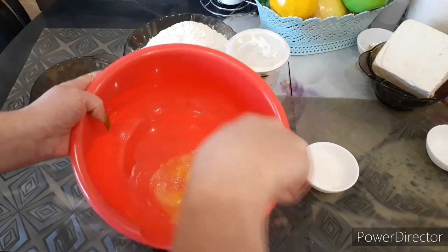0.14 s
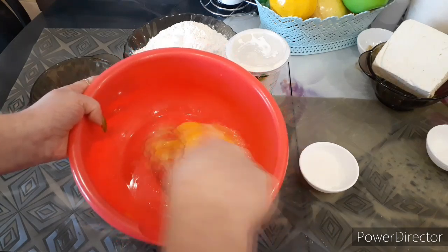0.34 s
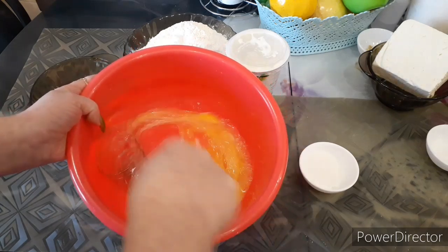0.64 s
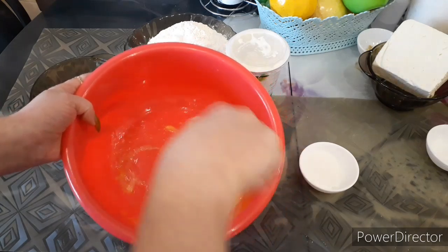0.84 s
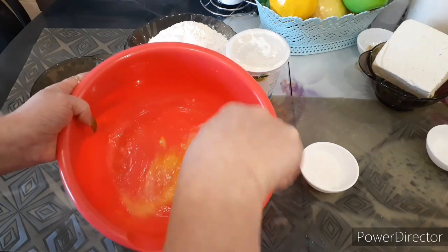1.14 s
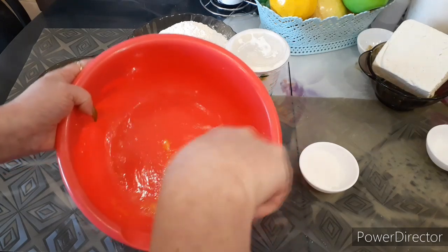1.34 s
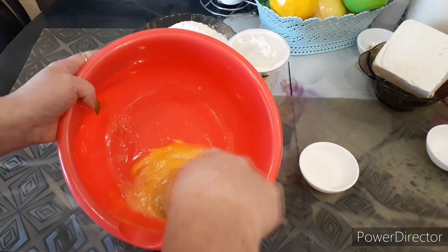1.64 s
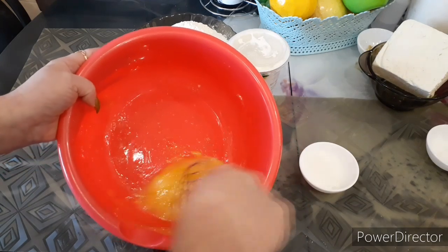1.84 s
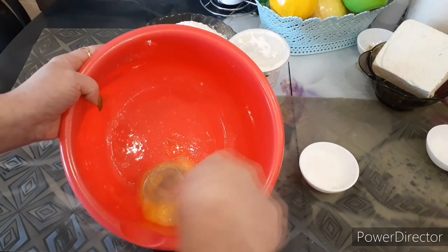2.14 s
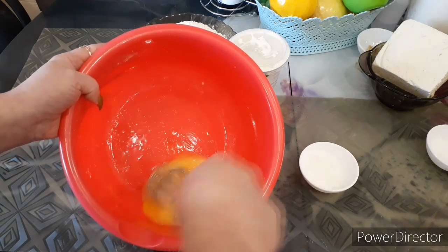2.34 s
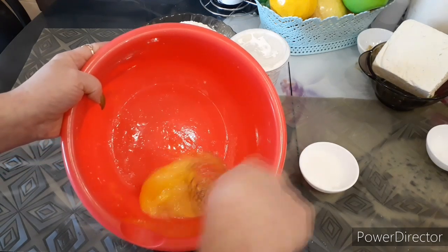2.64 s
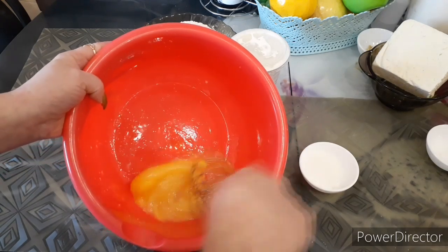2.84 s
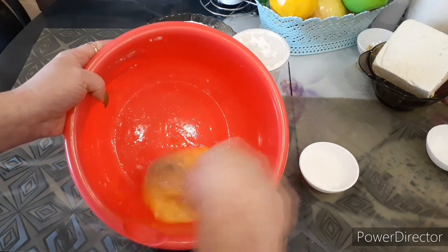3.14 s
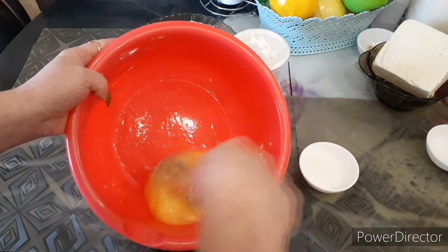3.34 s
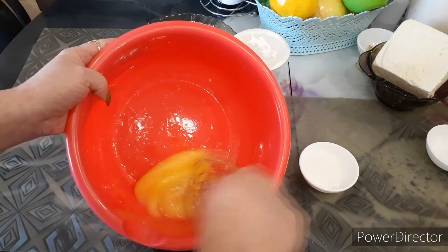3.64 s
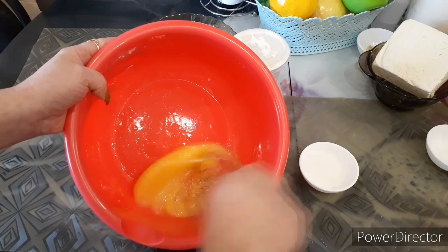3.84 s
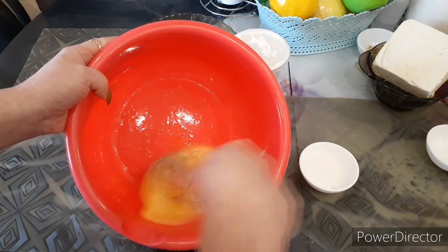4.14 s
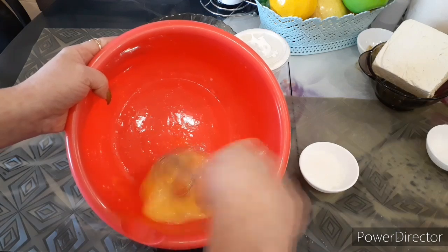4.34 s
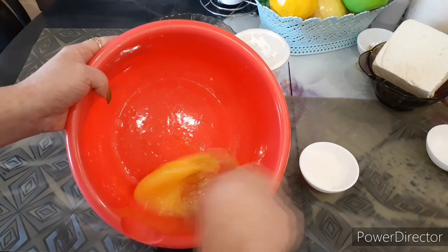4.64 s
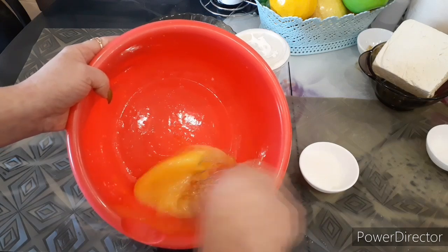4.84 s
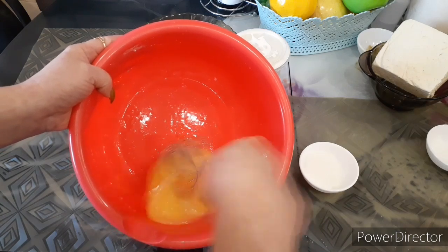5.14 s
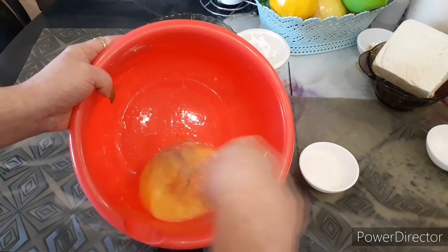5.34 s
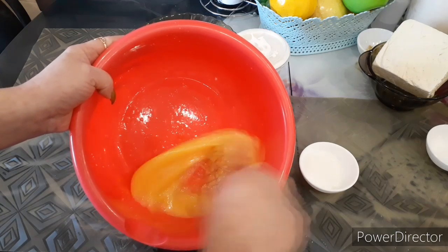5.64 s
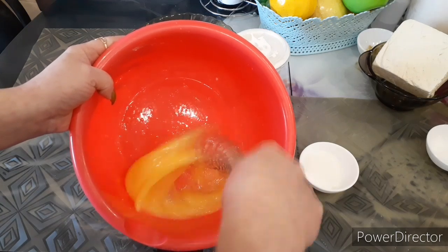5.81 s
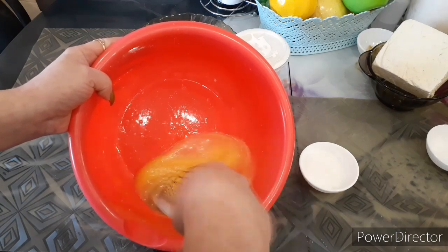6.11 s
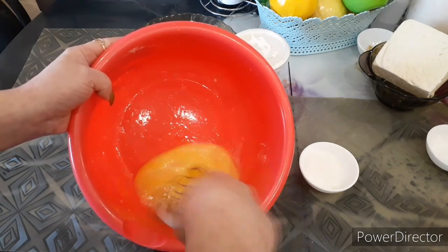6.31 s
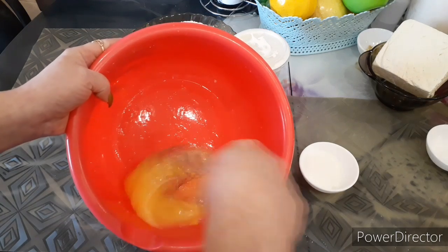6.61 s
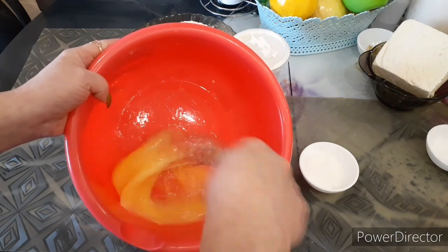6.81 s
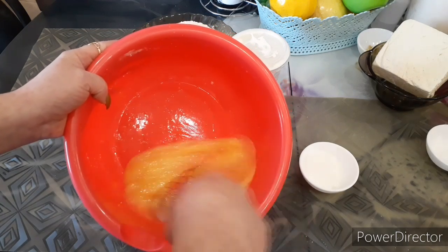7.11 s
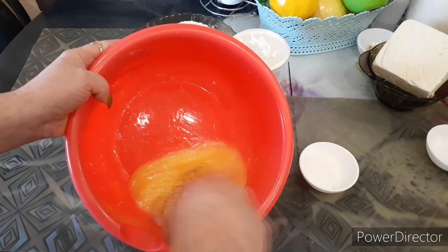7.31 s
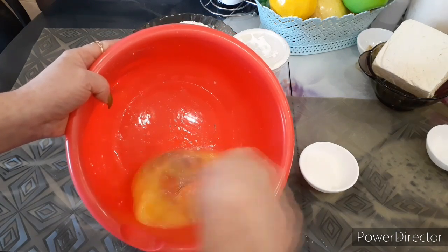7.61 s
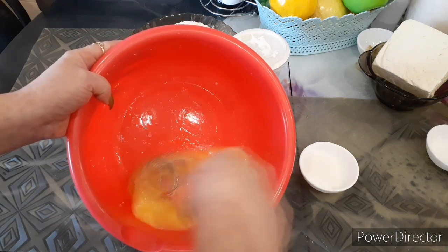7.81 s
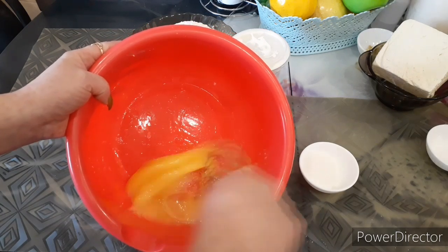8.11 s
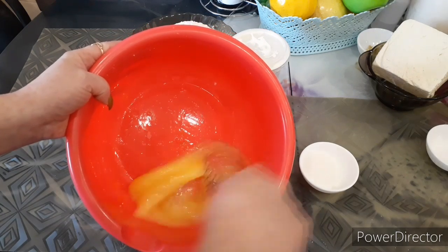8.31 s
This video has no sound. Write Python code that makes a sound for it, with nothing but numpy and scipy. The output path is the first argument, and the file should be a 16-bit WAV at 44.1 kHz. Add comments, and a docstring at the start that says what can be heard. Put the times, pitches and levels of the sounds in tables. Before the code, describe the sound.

A wire whisk quickly slaps the wall of a hollow plastic bowl while beating eggs, with wet scraping between the strokes, close up in a kitchen.

```python
"""In a kitchen, a wire whisk beats eggs in a tilted plastic bowl, about five turns a second, close to a two-port microphone.
The wires slap the wall (noise bursts and ringing tones) and bounce, so the bowl booms (low ringing tones).
They drag through the egg throughout (uneven filtered noise and tiny wet tones); each contact also pushes
the table (low tones). The kitchen answers with fading noise, over a faint hum of steady noise."""
import sys
import numpy as np
from scipy import signal
from scipy.fft import rfft, irfft, next_fast_len
from scipy.io import wavfile
from scipy.ndimage import uniform_filter1d, map_coordinates

SR = 44100
rng = np.random.default_rng(int(sys.argv[2]) if len(sys.argv) > 2 else 0)


def wav_record(signal):
    """Record a signal, one row per channel, as 16-bit PCM in the file named by sys.argv[1]."""
    frames = np.transpose(np.atleast_2d(signal))
    bounded = np.clip(frames, -1, 1)
    # unit amplitude maps onto the largest positive 16-bit level
    quanta = np.round(bounded * 32767).astype(np.int16)
    wavfile.write(sys.argv[1], SR, quanta)


N = 373086  # length [samples]


def amp(db):
    """Turn decibels into a plain multiplier."""
    return 10 ** (np.asarray(db) / 20)


def unit(x):
    """Scale a sound to an average (RMS) size of 1."""
    return x / np.sqrt(np.mean(x ** 2) + 1e-20)


def along(points, hz):
    """Read a curve of (frequency, value) points on a log frequency axis."""
    f, v = np.transpose(points)
    return np.interp(np.log(hz + 1), np.log(f + 1), v)


def filtered(x, response):
    """Multiply the spectrum of x by a complex response of frequency."""
    size = next_fast_len(N + 8192)
    return irfft(rfft(x, size) * response(np.fft.rfftfreq(size, 1 / SR)), size)[..., :N]


def causal(points):
    """Make a short minimum-phase filter of energy 1: its colour arrives as early as possible."""
    size = 2048
    curve = amp(along(points, np.fft.rfftfreq(size, 1 / SR)))
    cepstrum = irfft(np.log(curve + 1e-6))
    # folding the second half onto the first gives minimum phase
    cepstrum[1:size // 2] *= 2
    cepstrum[size // 2 + 1:] = 0
    h = irfft(np.exp(rfft(cepstrum)))[:size // 2]
    return h / np.linalg.norm(h)


def coloured(x, points):
    """Give noise the colour drawn by the points."""
    return signal.fftconvolve(x, causal(points)[None], axes=1)[:, :N]


def add(bus, s, sound):
    """Mix a short sound into the bus at s seconds."""
    i = max(round(s * SR), 0)
    bus[:, i:i + sound.shape[1]] += sound


def ring(modes, rise, spread_db, detune, lift_db=lambda hz: 0, punch=0, punch_s=0.0008):
    """One blow: every mode at a new strength, slightly retuned by grip and egg, in two versions."""
    t = np.arange(SR // 10) / SR
    hz, db, t60 = np.transpose(modes)[:, :, None]
    hz = hz * (1 + detune * rng.standard_normal(hz.shape))
    t60 = t60 * np.exp(.25 * rng.standard_normal())  # egg damps each spot differently
    shared = rng.standard_normal((len(hz), 1))
    own = rng.standard_normal((2, len(hz), 1))
    size = amp(db + lift_db(hz) + spread_db * (shared + .5 * own) - 60 * t / t60)
    sign = rng.choice([-1, 1], size=(2, len(hz), 1))
    # the struck spot empties fast
    shape = (1 - np.exp(-t / rise)) ** 2 * (1 + punch * np.exp(-t / punch_s))
    sound = (sign * size * np.sin(2 * np.pi * hz * t)).sum(1) * shape
    return sound / np.abs(sound).max(1, keepdims=True)


def burst(snap_t60, scatter_t60, scatter_db, count=9):
    """Noise: the first wire snaps, the others land unevenly after it; an echo across the bowl colours each spot."""
    t = np.arange(SR // 12) / SR
    late = t - .003 - rng.exponential(0.017, size=(count, 1))  # time since each later wire landed [s]
    sizes_db = rng.uniform(-6, 6, size=(count, 1))
    others = (late > 0) * amp(sizes_db - 60 * np.abs(late) / .007)
    snap = amp(-60 * t / snap_t60)
    scatter = amp(scatter_db - 60 * t / scatter_t60) * (.5 + others.sum(0))
    sound = (snap + scatter) * (1 - np.exp(-t / 0.00046)) * rng.standard_normal((2, len(t)))
    across = rng.integers(5, 40)  # echo delay [samples]
    return sound + .5 * np.pad(sound, ((0, 0), (across, 0)))[:, :len(t)]


# wires meeting the wall: (time [s], slap level [dB], treble level over the slap [dB],
# knock level [dB], central knock pitch [Hz], whole-shell ring level [dB])
HITS = [(0.0259, -27, -15, -26.5, 587, -30), (0.0835, -27.5, -27, -28, 665, -33),
        (0.1097, -11.5, -12.5, -13.5, 630, -25.5), (0.2742, -33, -14, -39, 501, -57),
        (0.2877, -27.5, -32, -37.5, 544, -60), (0.302, -32.5, -15, -36, 590, -45),
        (0.3691, -28, -22, -27.5, 512, -43), (0.4245, -32.5, -8, -33.5, 568, -52),
        (0.4567, -26, -10.5, -45, 636, -46), (0.5082, -34, -22, -30, 587, -56),
        (0.5744, -26, -20, -15, 569, -46), (0.6141, -14.5, -13, -28, 610, -42),
        (0.7216, -19, -2, -29, 620, -36), (0.7405, -23, -9, -21, 656, -37.5),
        (0.7784, -29.5, -0.5, -25.5, 630, -53), (0.8157, -32, -8, -34, 660, -40),
        (0.9068, -22, -6.5, -26, 608, -43), (0.9864, -35, -10, -39, 670, -50),
        (1.042, -21, -13, -15.5, 549, -29.5), (1.0784, -35.5, -5, -33, 600, -51),
        (1.119, -33, -1.5, -36, 550, -53), (1.174, -20.5, -15.5, -29.5, 545, -46),
        (1.2161, -30.5, -13, -33, 541, -49), (1.3494, -56, -19, -49, 576, -47),
        (1.529, -36.5, -15, -44, 604, -37), (1.5457, -26.5, -27, -28, 553, -38),
        (1.6111, -27, -8, -29, 610, -26.5), (1.6189, -20, -7.5, -12.5, 585, -29),
        (1.659, -10, -12.5, -20, 558, -51), (1.8177, -35, -15, -35, 530, -49),
        (1.8967, -13.5, -13, -19, 606, -34), (2.0453, -41.5, 1, -33.5, 580, -44),
        (2.124, -14, -9, -19, 588, -38), (2.1418, -20.5, -13, -27, 570, -33),
        (2.2766, -29.5, -27, -27, 590, -40), (2.3452, -11, -10, -15.5, 573, -29.5),
        (2.4917, -29, -5, -28.5, 610, -34), (2.5407, -19.5, -13.5, -13.5, 583, -35),
        (2.551, -17.5, -8.5, -31, 600, -31), (2.5704, -24, -17, -42, 615, -41),
        (2.6263, -33, -19, -52, 603, -52), (2.6961, -21, -18, -22, 592, -40),
        (2.7382, -17.5, -18, -15.5, 597, -30), (2.7529, -14.5, -12.5, -39, 630, -35),
        (2.8825, -29, -11, -23, 550, -34), (2.9392, -4, -12.5, -13.5, 560, -20.5),
        (3.0426, -30.5, -37, -41, 644, -55), (3.0839, -27, -12.5, -24, 608, -34),
        (3.1371, -15, -15.5, -20.5, 568, -32.5), (3.2818, -25, -8, -25, 583, -35.5),
        (3.3045, -30, -11, -27, 625, -37), (3.3285, -11.5, -26, -15.5, 573, -37),
        (3.3515, -23.5, -7.5, -48, 603, -36.5), (3.482, -28.5, -12.5, -32, 556, -31),
        (3.5169, -10, -14.5, -15.5, 562, -29), (3.6815, -29, -13, -24, 577, -33),
        (3.7233, -8, -13, -14.5, 555, -30.5), (3.8653, -32, -16, -22.5, 603, -33),
        (3.8798, -26, -13, -27, 587, -35), (3.924, -6.5, -17.5, -13, 550, -26.5),
        (4.0073, -34, -7, -45, 587, -43), (4.0793, -24, -8, -19, 563, -27.5),
        (4.107, -27, -9, -22, 573, -37), (4.1204, -9, -17, -10.5, 540, -26.5),
        (4.1386, -20, -11, -21, 580, -36), (4.2745, -25, -12, -22, 614, -28.5),
        (4.313, -10, -31, -13, 559, -32), (4.328, -20, -10.5, -31, 670, -22.5),
        (4.3886, -49, -20, -33, 597, -39), (4.447, -47, -22, -29, 590, -42),
        (4.4736, -25, -12, -24, 664, -30), (4.5095, -7, -13.5, -14.5, 545, -25),
        (4.6716, -29, -29, -32, 610, -38), (4.6848, -23.5, -16, -24.5, 570, -28.5),
        (4.716, -8.5, -17.5, -17, 544, -28), (4.7363, -20, -18, -44, 501, -41),
        (4.7615, -25, -23, -24.5, 550, -50), (4.8812, -29.5, -9, -26.5, 578, -29.5),
        (4.9225, -7.5, -12, -12.5, 561, -20), (5.0808, -23.5, -16, -21.5, 648, -27),
        (5.1034, -8, -12.5, -15, 533, -29.5), (5.2777, -24, -9, -20.5, 635, -29),
        (5.3162, -4.5, -17, -10.5, 544, -27), (5.365, -23, -12, -44, 543, -27),
        (5.477, -24, -16, -22, 535, -33), (5.5176, -9.5, -13.5, -7.5, 547, -26),
        (5.6745, -22.5, -11, -20, 510, -26), (5.7019, -19, -9.5, -14.5, 683, -20),
        (5.7273, -4, -15, -11, 536, -32), (5.7966, -12.5, -47, -28, 500, -33.5),
        (5.88, -23.5, -10, -21, 543, -27), (5.9086, -15, -10.5, -24, 662, -18.5),
        (5.9339, -7.5, -15.5, -7, 569, -26), (5.9773, -23, -27, -20, 586, -22),
        (6.0136, -21, -41, -33, 633, -45), (6.0484, -36.5, -9, -29, 563, -37),
        (6.088, -18, -19, -26, 494, -26), (6.1106, -16.5, -10.5, -17.5, 597, -28),
        (6.1456, -11.5, -24.5, -22, 608, -23.5), (6.226, -27, -23, -52, 638, -48),
        (6.3071, -22.5, -17, -25, 602, -32.5), (6.353, -6.5, -21.5, -11, 557, -32),
        (6.3914, -30, -5, -47, 608, -36), (6.5141, -27.5, -8, -20, 560, -30),
        (6.5547, -11.5, -15.5, -14, 568, -32), (6.5914, -21, -26, -29, 550, -35),
        (6.6505, -31, -23, -25.5, 627, -35), (6.7216, -25, -9.5, -17.5, 566, -33),
        (6.7705, -12.5, -8, -9.5, 536, -31), (6.778, -12, -40, -22, 570, -26.5),
        (6.9282, -28, -10, -17.5, 497, -30), (6.9553, -26.5, 1, -34, 543, -35),
        (6.982, -7.5, -11, -23.5, 503, -26.5), (7.005, -11, -12.5, -10.5, 556, -35),
        (7.1281, -21, -25, -30.5, 496, -32), (7.1642, -18.5, -19, -15.5, 570, -23.5),
        (7.1901, -8, -15.5, -12, 567, -28), (7.3449, -26.5, -14, -24, 604, -37),
        (7.3898, -11, -19, -19.5, 522, -28.5), (7.5517, -25.5, -9.5, -22, 590, -34.5),
        (7.5977, -8.5, -12.5, -9, 583, -29.5), (7.7608, -24, -14, -21, 574, -30),
        (7.8076, -8.5, -12, -13, 540, -31), (7.9161, -28, -29, -46, 613, -43),
        (7.9383, -25, -24, -28, 550, -24.5), (7.9518, -23.5, -11, -23.5, 518, -37),
        (7.9648, -20.5, -22, -22, 550, -44), (8.018, -6, -13, -13, 598, -27),
        (8.0737, -26, -7, -30, 530, -34), (8.134, -28.5, -10, -25, 581, -42),
        (8.1714, -24.5, -17, -22, 600, -32), (8.2225, -6.5, -18, -16, 552, -27),
        (8.2784, -30.5, -21, -25, 535, -37), (8.3845, -23.5, -18, -26, 610, -32),
        (8.4303, -9.5, -16, -13, 555, -39)]
# bending tones of the wall, before scatter: (frequency [Hz], level [dB], time to fall 60 dB [s])
WALL_TONES = [(1131, -10.5, 0.08), (1307, -10, 0.14), (1412, -4.5, 0.03), (1592, -1, 0.017),
              (1690, -10, 0.1), (1889, -4.5, 0.023), (2105, -4.5, 0.12), (2187, -0.5, 0.036),
              (2350, -4, 0.055), (2530, -8, 0.024), (3600, 0.5, 0.016), (3700, -12.5, 0.0087),
              (3810, -5.5, 0.012), (4320, -23, 0.01)]
# colour of steel on plastic: (frequency [Hz], relative level [dB per Hz])
CRACK_COLOUR = [(530, -73), (900, -10), (1380, -15.5), (1560, 1), (2090, -8.5), (2840, -8.5), (3680, -5.5),
                (7000, -31.5), (9100, -12), (15400, -120)]
# colour of wires clashing, also used for froth hiss: (frequency [Hz], relative level [dB per Hz])
FIZZ_COLOUR = [(2940, -28.5), (5000, -4), (6440, -2), (7600, -9), (9210, 1.5), (10600, -3.5), (12700, -4),
               (15000, -11.5)]
UPPER_DB, USUAL_TREBLE_DB = -7, -15  # upper wall tones at the usual treble level
UPPER_SCATTER_DB = 2.5
DAMP_S, DAMPED_DB = 0.028, -10  # how soon egg closes over the struck wall; the share of ring it leaves


def strikes():
    """Every contact cracks and rings the wall; a brighter slap also rings the upper tones more."""
    tones, crack, fizz = np.zeros((3, 2, N + SR))
    snap_t60 = .007
    t = np.arange(SR // 10) / SR
    damp = amp(DAMPED_DB) + np.exp(-(t / DAMP_S) ** 2)
    for s, db, treble_db, *_ in HITS:
        upper_db = UPPER_DB + treble_db - USUAL_TREBLE_DB + UPPER_SCATTER_DB * rng.standard_normal()
        wall = ring(WALL_TONES, rise=0.00019, spread_db=4.5, detune=0.028, punch=0.31,
                    lift_db=lambda hz: (hz > 2700) * (upper_db + 7))
        add(tones, s, amp(db - 3) * damp * wall)
        add(crack, s, amp(db + 0.44 * upper_db + 2.0) * burst(snap_t60, 0.087, scatter_db=-9.5))
        add(fizz, s, amp(db + treble_db + 6.5) * burst(snap_t60, 0.059, scatter_db=-8.5))
    return tones[:, :N] + coloured(crack[:, :N], CRACK_COLOUR) + coloured(fizz[:, :N], FIZZ_COLOUR)


# tones of the whole shell breathing, before scatter: (frequency [Hz], level [dB], time to fall 60 dB [s])
SHELL_TONES = [(243.4, -12.5, 0.14), (283.6, -8, 0.35), (318.4, 0.5, 0.14), (336.3, -17, 0.48),
               (810, -8.5, 0.13)]
# the bowl's knock, whose pitch shifts with tilt and egg, before scatter:
# (ratio to its central pitch, level [dB], time to fall 60 dB [s])
KNOCK_TONES = [(.84, -12.5, 0.017), (0.931, -10.5, 0.064), (1, 2.5, 0.075), (1.08, -6, 0.036),
               (1.201, -11.5, 0.072)]
REBOUND_S, REBOUND_DB = .022, -18  # typical wait between the wires' rebounds; typical change of knock at each
PRESS_S, AFTER_DB = .011, -13.5  # wires press this long, then damp the knock to about this level
SOFT_LEAD_S = .0001  # a soft slap lags its knock [s per dB]


def bumps():
    """The bowl's knock swells while the wires press, then drops, over a ringing shell;
    the springy wires rebound and knock it again."""
    bus = np.zeros((2, N + SR))
    t = np.arange(SR // 10) / SR
    press = amp(AFTER_DB) + np.exp(-(t / PRESS_S) ** 3)
    for s, slap_db, _, knock_db, hz, shell_db in HITS:
        waits = np.cumsum(REBOUND_S * rng.uniform(0.5016, 1.5, size=2))
        tuned = KNOCK_TONES * np.array([hz, 1, 1])
        for k, wait in enumerate([0, *waits]):
            knock = press * ring(tuned, rise=.004, spread_db=5.5, detune=0.012)
            # only the rebounds vary at random in level
            level_db = knock_db + k * REBOUND_DB + 2.8 * (k > 0) * rng.standard_normal()
            add(bus, s + wait + SOFT_LEAD_S * slap_db, amp(level_db) * knock)
        add(bus, s, amp(shell_db) * ring(SHELL_TONES, rise=0.0006, spread_db=3.5, detune=0.015))
    return bus[:, :N]


def clumps(db):
    """A random level that wanders smoothly, with a new target every 700 samples."""
    targets = rng.standard_normal(N // 700 + 4)
    return amp(db * map_coordinates(targets, [np.arange(N) / 700]))


def body(modes):
    """How a rubbed body answers: resonances about six times broader than when struck."""
    def response(f):
        total = 0
        for k, (hz, db, t60) in enumerate(modes):
            drive = (-1) ** k * amp(db) * 1j * f * (2.2 / t60)
            total = total + drive / (hz * hz - f * f + 1j * f * 13.3 / t60)
        return total
    return response


# wires dragging through egg along the wall, before fixed trims in the mix:
# (time [s], rasp level [dB], shell rumble level over the rasp [dB])
DRAG_LEVELS = [(0, -51.5, 14.5), (.2, -49, 8), (.27, -56.5, -7), (.41, -49.5, 5), (.46, -41.5, -5),
               (.56, -49.5, -5), (.76, -44, 14), (.88, -48.5, -5), (1.11, -49, 4), (1.25, -56, 3),
               (1.34, -71, 9), (1.44, -51.5, -9), (1.52, -50, -10), (1.72, -48.5, -1.5),
               (2.94, -43.5, -7.5), (3.37, -49.5, -0.5), (3.89, -44.5, 1), (4.4, -46, 2.5), (4.76, -47, 0),
               (5.6, -45, 3), (6, -42, 0), (6.6, -45, 2), (7.12, -39, 4.5), (7.42, -47.5, 0),
               (8.13, -41.5, 4), (8.46, -41, 1.5)]
# colour of the rasp: (frequency [Hz], relative level [dB per Hz])
RASP_COLOUR = [(470, -10.5), (800, -4.5), (995, -2.5), (1280, 2.5), (1390, -5), (1680, -2), (2770, -6),
               (3880, -5.5), (7000, -21), (9100, -62), (15400, -120)]
USUAL_RASP_DB = -46
HISS_DB, HISS_GROWS = -7.5, 1.42  # froth hiss over the usual rasp; growth [dB per dB of rasp]


def drag():
    """Wires stick and slip: uneven rasp and wet ticks on a froth hiss, shaking wall and shell."""
    s, *levels = np.transpose(DRAG_LEVELS)
    rasp_db, rumble_db = [np.interp(np.arange(N) / SR, s, level) for level in levels]
    hiss_db = USUAL_RASP_DB + HISS_DB + HISS_GROWS * (rasp_db - USUAL_RASP_DB)
    pressure = clumps(4.5)  # shared by all the rubbing sounds

    def rub():
        return pressure * clumps(2.43) * rng.standard_normal((2, N))

    scrape = unit(coloured(rub(), RASP_COLOUR))
    wall = unit(filtered(rub(), body(WALL_TONES)))
    rasp = scrape + amp(-14.0) * wall
    knock = KNOCK_TONES * np.array([570, 1, 1]) + [0, 6.5, 0]  # tuned to 570 Hz, 6.5 dB up
    rumble = unit(filtered(rub(), body(np.vstack([SHELL_TONES, knock]))))
    hiss = unit(coloured(rub(), FIZZ_COLOUR))
    ticks = drops(rasp_db - 7.5, per_second=350, lowest_hz=1420, cycles=7.9)
    return (amp(rasp_db - 2.5) * rasp + amp(rasp_db + rumble_db - 3.5) * rumble
            + amp(hiss_db) * hiss + ticks)


def drops(level_db, per_second, lowest_hz, cycles):
    """Wet ticks and bursting froth: short damped tones of scattered pitch and size."""
    count = int(per_second * N / SR)
    when, pitch, size, side = rng.random((count, 4)).T
    t = np.arange(SR // 200) / SR
    f = lowest_hz * 8 ** pitch[:, None]  # spread over three octaves
    start = (when * N).astype(int)
    size_db = level_db[start] + 14 * size ** 2
    tone = amp(size_db)[:, None] * np.exp(-t * f / cycles) * np.sin(2 * np.pi * f * t)
    at = (start[:, None] + np.arange(len(t))).ravel()
    weights = np.cos(2 * np.pi * side), np.sin(2 * np.pi * side)
    return np.array([np.bincount(at, (tone * w[:, None]).ravel(), N + len(t))[:N] for w in weights])


# the bowl shifts once on the table: (time [s], level [dB])
BOWL_SHIFT = (.86, -42)
THUMP_DB, USUAL_KNOCK_DB, THUMP_GROWS = -49.5, -20, 0.5  # thump at a usual knock; growth [dB per dB of knock]


def table_thump():
    """Each contact sends a soft push, a short low tone near 140 Hz, through hand and table."""
    bus = np.zeros((2, N + SR))
    t = np.arange(SR // 8) / SR
    pushes = [(s, THUMP_DB + THUMP_GROWS * (knock_db - USUAL_KNOCK_DB)) for s, _, _, knock_db, *_ in HITS]
    for s, db in pushes + [BOWL_SHIFT]:
        hz = 140 * np.exp(0.15 * rng.standard_normal((2, 1)))
        fade = amp(db - 60 * t / 0.26) * (1 - np.exp(-t / 0.0028))
        add(bus, s, fade * np.sin(2 * np.pi * hz * t))
    return bus[:, :N]


# how long the room rings: (frequency [Hz], time to fall 60 dB [s])
ROOM_FADE = [(100, 1), (500, 0.22), (2000, 0.23), (8000, 0.24), (16000, 0.18)]


def kitchen(x):
    """The walls return each band's energy as fresh noise, blurred in the treble, that dies at its own speed."""
    frames = dict(fs=SR, nperseg=1024, noverlap=768)
    hz, t, spectrum = signal.stft(x, **frames)
    keep = amp(-120 * (t[1] - t[0]) / along(ROOM_FADE, hz))  # power kept per frame
    power = np.abs(spectrum).mean(0) ** 2
    blurred = np.abs(uniform_filter1d(power, size=7, axis=0))
    power = np.where(hz[:, None] > 1000, blurred, power)
    # the tail arrives two frames late
    tail = [signal.lfilter([0, 0, 1 - k], [1, -k], p) for k, p in zip(keep, power)]
    noise = signal.stft(rng.standard_normal(x.shape), **frames)[2]
    return signal.istft(noise / np.abs(noise).mean() * np.sqrt(tail), **frames)[1][:, :N]


# colour of the quiet kitchen: (frequency [Hz], relative level [dB per Hz])
HUM_COLOUR = [(15, -47), (25, -21.5), (196, 14), (243, 9.5), (301, -26), (604, -65), (927, -31),
              (1670, -44), (2500, -28), (3180, -28), (6720, -39), (9020, -13), (15000, -41)]


def room_hum():
    """The quiet kitchen: steady noise, strongest in the bass."""
    return amp(-63.0) * unit(coloured(rng.standard_normal((2, N)), HUM_COLOUR))


# how alike left and right are: (frequency [Hz], likeness from 0 to 1)
LIKENESS = [(60, 0.81), (180, 0.98), (550, 0.85), (1650, 0.17), (4970, 0.035), (15000, 0.024)]


def ports(pair):
    """Two versions of a sound become left and right, alike in the bass."""
    def turn(hz):
        return np.arccos(np.clip(along(LIKENESS, hz), 0, 1)) / 2

    mid, side = filtered(pair, lambda hz: np.array([np.cos(turn(hz)), np.sin(turn(hz))]))
    return np.array([mid + side, mid - side])


def scene():
    """Mix the bowl, the kitchen's answer and the hum, then place them left and right."""
    bowl = strikes() + bumps() + drag() + table_thump()
    return ports(bowl + amp(-7.5) * kitchen(bowl) + room_hum())


# colour difference of the two ports: (frequency [Hz], left minus right [dB])
PORT_TILT = [(60, 2), (130, -1.5), (290, 0.5), (640, 3), (1410, 0), (3100, 1), (6820, 0), (15000, 4.5)]


def record(dry):
    """The ports differ a little in colour, round off the hardest peaks and lose the deepest bass and top treble."""
    def colour(hz):
        bass_cut = 1j * hz / (40 + 1j * hz)
        return amp(np.outer([.5, -.5], along(PORT_TILT, hz))) * bass_cut

    x = filtered(dry, colour)
    x = x / (1 + np.abs(x / .95) ** 4) ** (1 / 4)
    # treble slopes down above 15200 Hz and stops at 16677 Hz
    return filtered(x, lambda hz: amp(-.02 * np.maximum(hz - 15200, 0)) * (hz < 16677))


dry = scene()
out = record(dry)
wav_record(out)
```